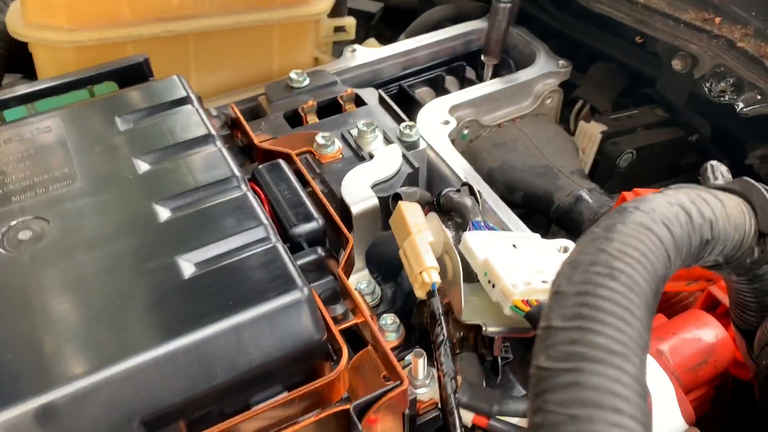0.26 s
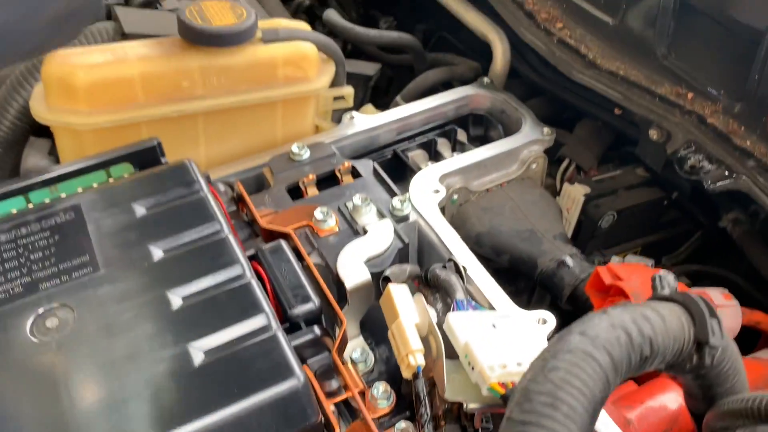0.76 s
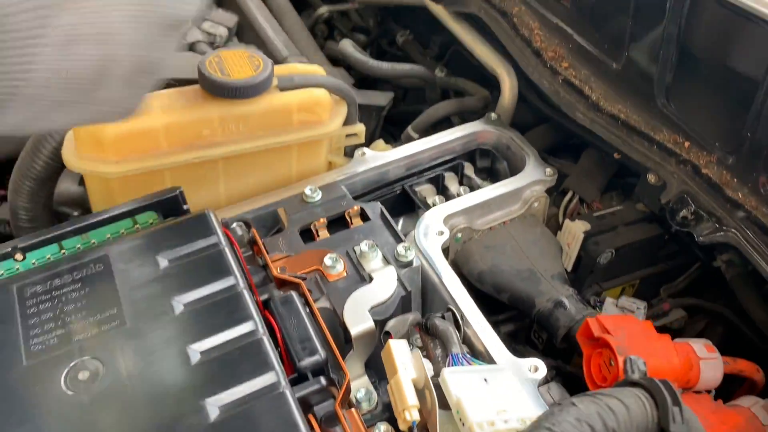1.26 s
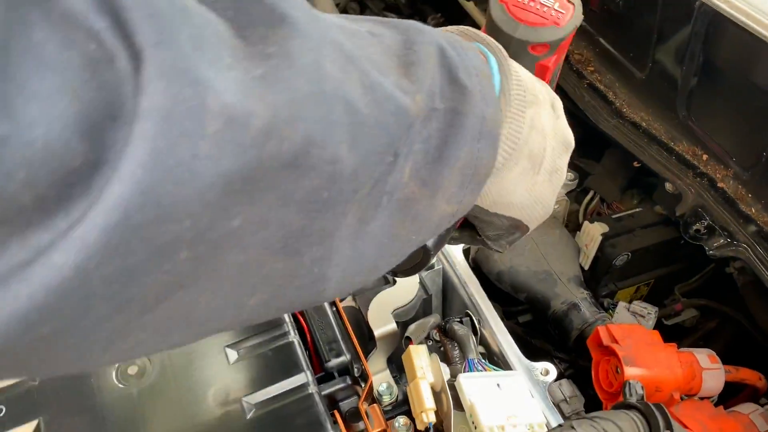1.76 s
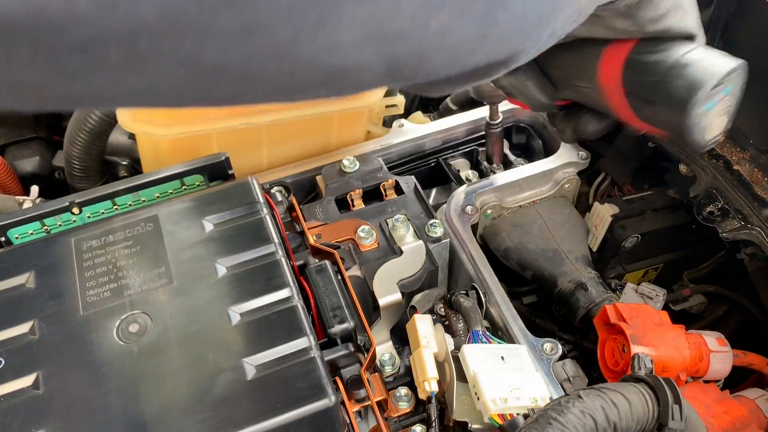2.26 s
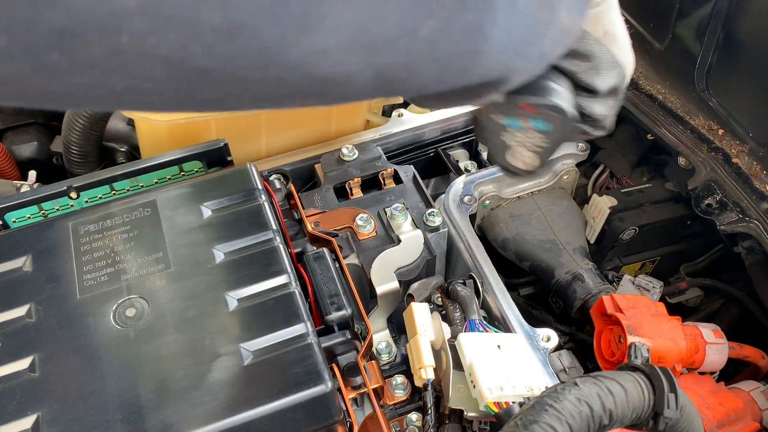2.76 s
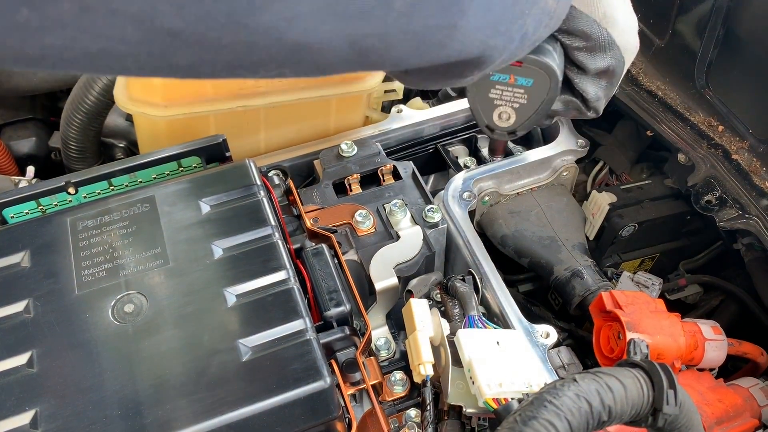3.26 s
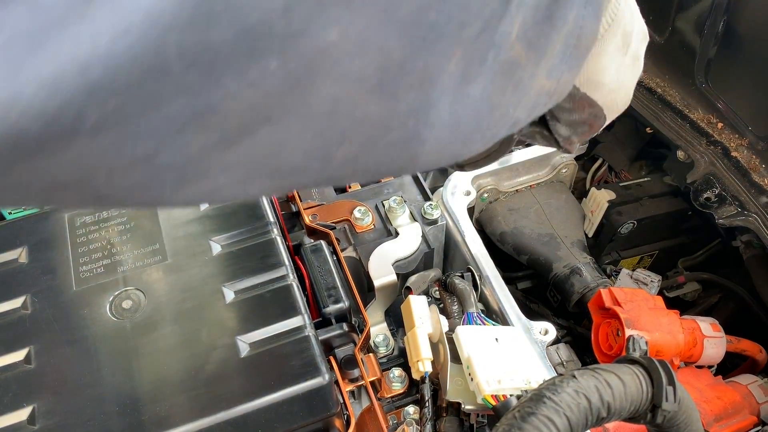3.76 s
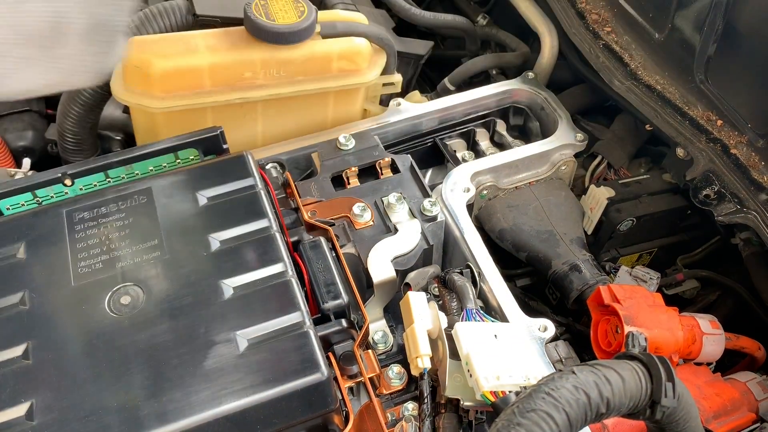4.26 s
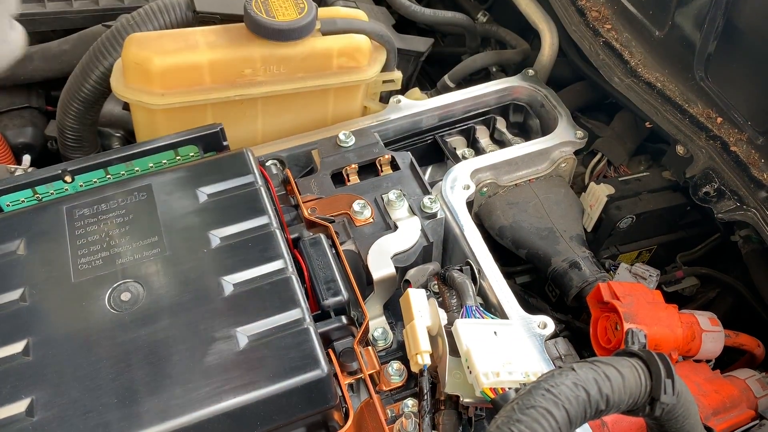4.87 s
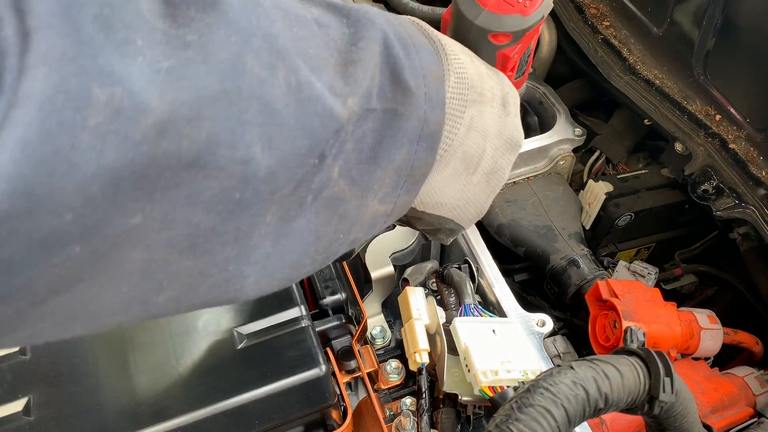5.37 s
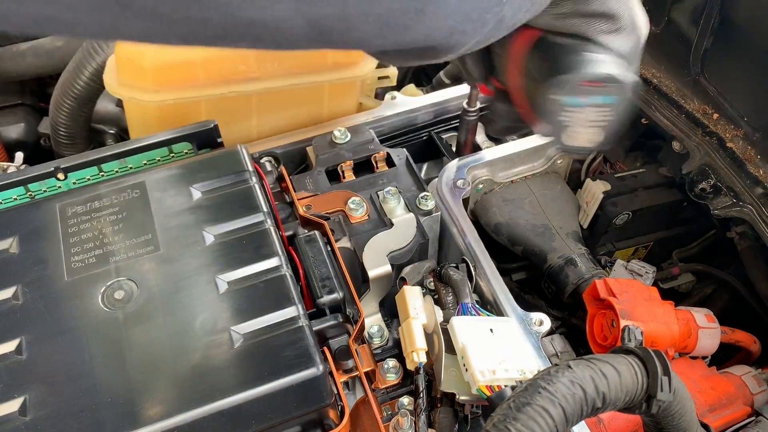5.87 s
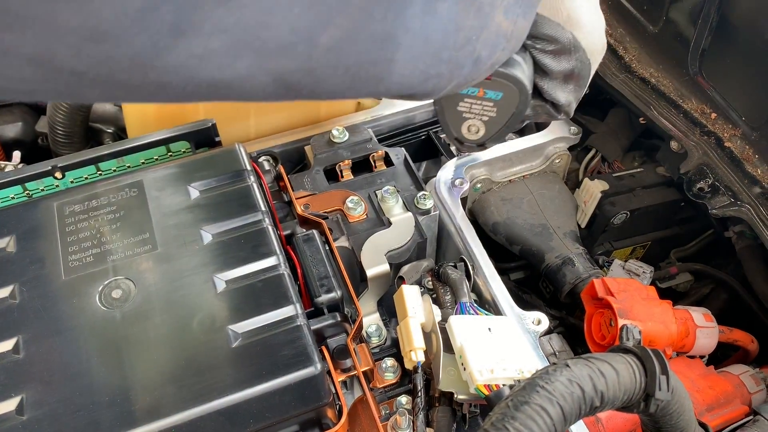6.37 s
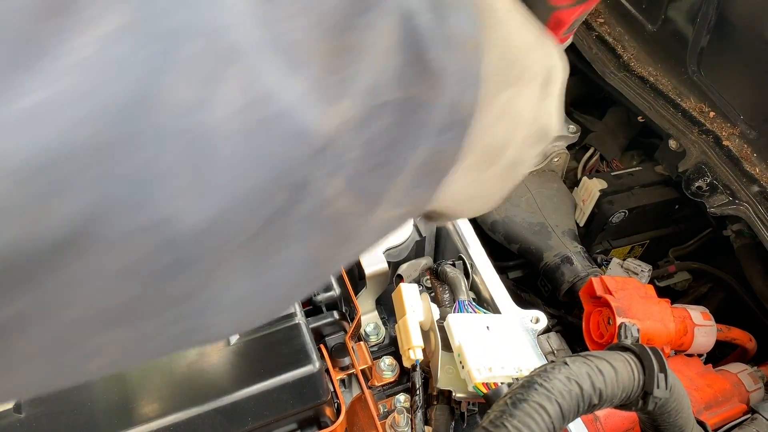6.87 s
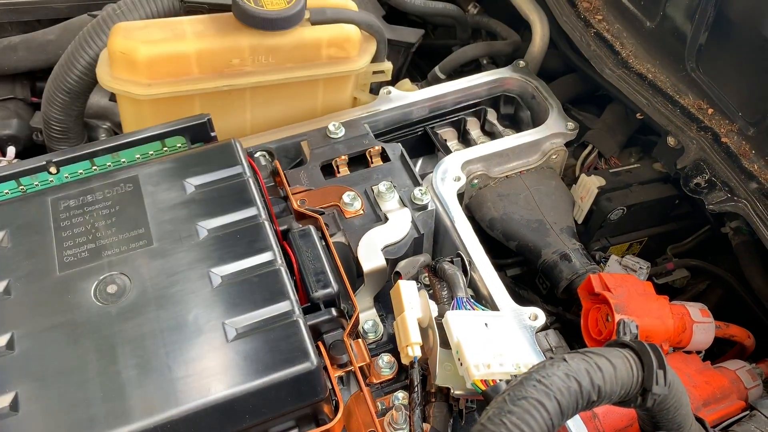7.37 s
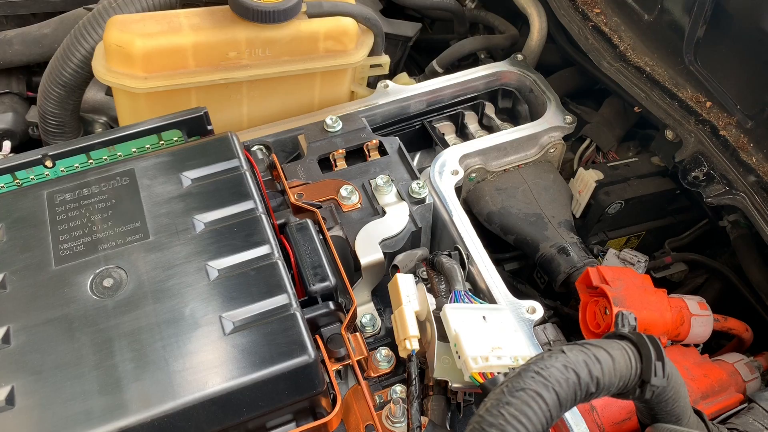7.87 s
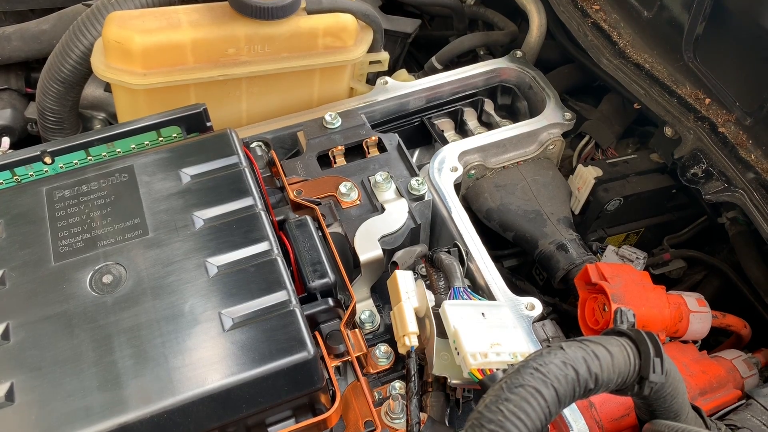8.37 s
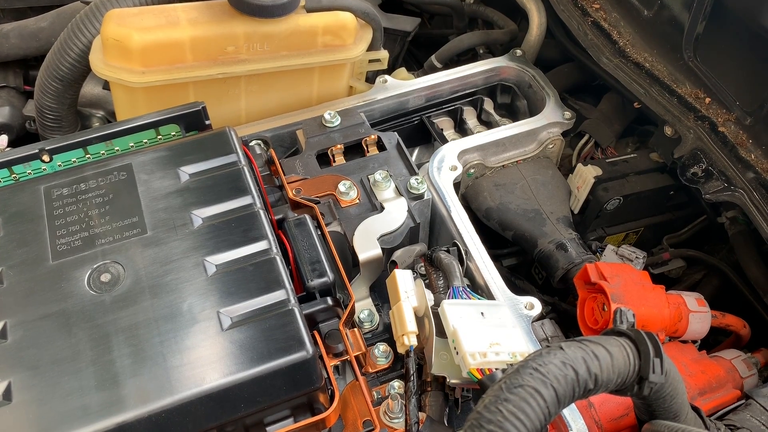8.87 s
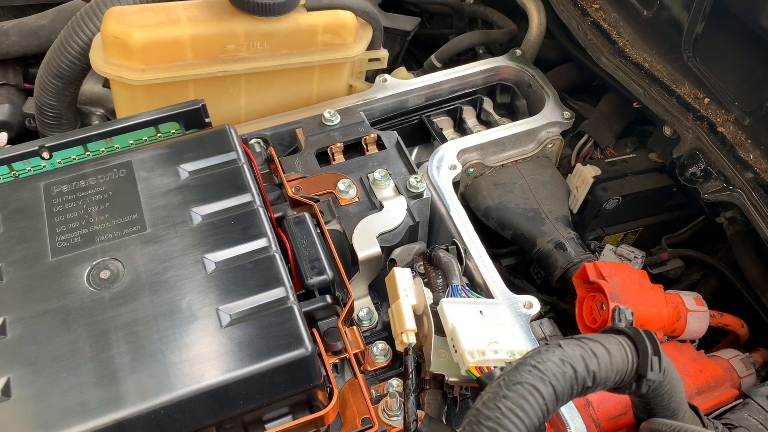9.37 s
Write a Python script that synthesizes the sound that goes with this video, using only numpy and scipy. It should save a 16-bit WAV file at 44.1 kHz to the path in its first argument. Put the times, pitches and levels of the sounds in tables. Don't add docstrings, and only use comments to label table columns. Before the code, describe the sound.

A cordless impact driver hammers loose bolts in three short loud bursts in a car engine bay, with metal taps, cloth rustle and low traffic between.

```python
import sys
import numpy as np
from scipy import signal
from scipy.fft import rfft, irfft, next_fast_len
from scipy.io import wavfile
from scipy.ndimage import uniform_filter1d, map_coordinates

SR = 44100
rng = np.random.default_rng(int(sys.argv[2]) if len(sys.argv) > 2 else 0)


def wrap_up_sound(samples):
    columns = np.atleast_2d(samples).T
    tamed = np.clip(columns, -1, 1)
    steps = np.round(tamed * 32767).astype(np.int16)
    wavfile.write(sys.argv[1], SR, steps)


def elevation(decibels):
    levels = np.asarray(decibels, float)
    return 10 ** (levels / 20)


N = 424683


def unit(x):
    return x / np.sqrt(np.mean(x ** 2) + 1e-20)


def along(points, hz):
    f, v = np.transpose(points)
    return np.interp(np.log(hz + 1), np.log(f + 1), v)


def curves(rows, outside=None):
    s, *cols = np.transpose(rows)
    return [np.interp(np.arange(N) / SR, s, c, outside, outside) for c in cols]


def wobble(rate):
    coarse = np.arange(0, N + 16, 16)
    knots = rng.standard_normal(6000)
    return np.interp(np.arange(N), coarse, map_coordinates(knots, [coarse * rate / SR]))


def filtered(x, response):
    m = next_fast_len(N + SR // 4, real=True)
    return irfft(rfft(x, m) * response(np.fft.rfftfreq(m, 1 / SR)), m)[..., :N]


def through(x, body):
    def shape(f):
        if len(body[0]) == 2:
            return elevation(along(body, f))
        total = 0
        for k, (centre, width, db) in enumerate(body):
            sign = (-1) ** k
            total = total + sign * elevation(db) * 1j * f * width / (centre * centre - f * f + 1j * f * width)
        return total

    norm = np.sqrt(np.mean(np.abs(shape(np.arange(1., SR / 2, 4))) ** 2))
    return filtered(x, lambda f: shape(f) / norm)


def ringing(x, hz, width_hz):
    return signal.lfilter(*signal.iirpeak(hz, hz / width_hz, fs=SR), x)


def grit(depth_db, rate):
    return unit(elevation(depth_db * wobble(rate)) * rng.standard_normal(N))


def patchy(x, depth_db):
    z = signal.stft(x, nperseg=512)[2]
    field = rng.standard_normal(z.shape[-2:])
    field = uniform_filter1d(field, size=5, axis=0)
    field = uniform_filter1d(field, size=30, axis=1)
    return signal.istft(z * elevation(depth_db * unit(field)), nperseg=512)[1][..., :N]


def contact(s, swell_s, count=1, hold_s=0):
    t, swell_s = np.arange(SR // 7) / SR, max(swell_s, .0005)
    u = (t - np.clip(t - swell_s, 0, hold_s)) / swell_s
    return round(s * SR), (u * np.exp(1 - u)) ** 1.6 * rng.standard_normal((count, len(u)))


def ports(x, lead, stretch=1):
    def response(hz):
        stretched = hz * (1 + (stretch - 1) / (1 + (hz / 4000) ** 8))
        return np.exp(.5j * np.outer([1, -1], along(lead, stretched)))
    return filtered(x, response)


# motor start t/s, hammer start t/s, release t/s, force level/dB
PULLS = [
    (-.45, -0.17, .131, 3),
    (3.075, 3.3566, 3.64, 0),
    (6.109, 6.3765, 6.574, -0.5),
]
STAGES = [
    (-48.5, -24.5, -26, -22, -20.5, -27, -40.5, -61),
    (-54.5, -24.5, -24.5, -21, -19, -23.5, -43.5, -70.5),
    (-46.5, -27.5, -29, -39.5, -28.5, -36.5, -42.5, -49.5),
    (-54.5, -28.5, -35.5, -36.5, -37, -42, -52.5, -65),
]
WAKE_S, BITE_S, SETTLE_S = 0.038, 0.014, 0.19
BUILD_S, COAST_S, STOP_S = 0.19, 0.061, .2


def stages(start, hammer, release, force_db, cover_db):
    s = [start - WAKE_S, start + BITE_S, start + SETTLE_S,
         hammer, hammer + BUILD_S, release, release + COAST_S, release + STOP_S]
    tool_db = np.add(STAGES[:3], force_db)
    drum_db = np.add(STAGES[3], cover_db)
    return curves(np.transpose([s, *tool_db, drum_db]), outside=-120)


# t/s, crack level/dB, housing level over crack/dB
KICKS = [(3.0779, -12, 0.5), (3.1023, -5.5, -2.5), (3.1134, -4.5, -19), (3.1347, -0.5, -8.5),
         (3.1669, -12, -9.5), (3.6205, -16.5, -15), (6.092, -25.5, -11), (6.103, -14, -7),
         (6.2315, -16, -9), (6.6137, -27, -12), (6.13, -10, -5.5), (6.1487, -2.5, -9.5), (.0034, -7, -11)]
# t/s, crack level/dB, housing level over crack/dB
BLOWS = [(0.0139, -8, -13.5), (0.0305, -6, -12), (0.0516, -5.5, -18), (0.0652, -9, -14), (0.0701, -8, -10),
         (0.0911, -8, -10.5), (0.11, -10.5, -10.5), (0.1245, -10, -11.5), (3.3582, -6.5, -10.5),
         (3.3774, -7.5, -7.5), (3.3979, -5.5, -11), (3.421, -13, -9.5), (3.4421, -7.5, -12.5),
         (3.4604, -8, -10), (3.481, -6, -13.5), (3.5009, -5, -17.5), (3.522, -7.5, -14.5),
         (3.5469, -6.5, -13.5), (3.5681, -7.5, -14), (3.5945, -11, -12.5), (6.3773, -6.5, -7),
         (6.3985, -4, -15), (6.419, -5.5, -12), (6.438, -7, -8), (6.4579, -8, -10), (6.4789, -6, -11),
         (6.4987, -9.5, -11), (6.5184, -8, -11), (6.5393, -14.5, -10.5), (6.5552, -16, -6),
         (6.5731, -9.5, -13.5)]


def blows():
    return list(KICKS) + [(s - .001, db, body_db) for s, db, body_db in BLOWS]


COVER_DB = (9.5, -2, -4)
# f/Hz, width/Hz, level/dB
HOUSING = [(547, 40, -9), (780, 82, -10.5), (898, 50, -3.5), (1100, 75, 2.5), (1430, 110, 2),
           (1620, 400, 0), (2034, 380, -0.5), (2490, 30, -7), (2616, 47, -3.5), (2800, 440, -0.5)]
# f/Hz, level per Hz/dB
STEEL = [(2300, -43), (2900, -0.5), (4000, -0.5), (5200, 3.5), (6000, 0), (8000, -3), (10000, -6),
         (12000, 0), (13500, -7), (15600, -13), (16200, -49.5)]
# f/Hz, width/Hz, level/dB
GRIP = [(49, 4.8, -1.5), (144, 36, 2.5), (275, 11, -9)]
# f/Hz, width/Hz, level/dB
DRUMMING = [(532, 55, -0.5), (685, 170, -2.5), (400, 220, -5), (270, 40, -3)]


def driver():
    levels = [stages(*pull, db) for pull, db in zip(PULLS, COVER_DB)]
    housing_db, gear_db, shake_db, cover_db = np.max(levels, axis=0)
    housing, gears, shake = np.zeros((3, N + SR))
    housing[:N] = elevation(housing_db - 1.56) * grit(depth_db=1.5, rate=110)
    gears[:N] = elevation(gear_db + 2.0) * grit(depth_db=3.2, rate=330)
    shake[:N] = elevation(shake_db - 4.0) * grit(depth_db=5.0, rate=18)
    cover = elevation(cover_db) * grit(depth_db=4.0, rate=46)
    for s, db, body_db in blows():
        at, (crack,) = contact(s, swell_s=.0021)
        gears[at:][:len(crack)] += elevation(db - 3.5) * crack
        at, (knock, kick) = contact(s, swell_s=0.0029, count=2)
        housing[at:][:len(knock)] += elevation(db + body_db - 1.0) * knock
        shake[at:][:len(kick)] += elevation(db + body_db - 9.0) * kick
    casting = through(patchy(housing[:N], depth_db=1.5), HOUSING)
    return casting + through(gears[:N], STEEL) + through(shake[:N], GRIP) + through(cover, DRUMMING)


# f/Hz, level per Hz/dB
RUMBLE = [(12, -35.5), (20, -3.5), (48, 1.5), (124, -2.5), (195, -12.5), (255, -16.5), (330, -18.5),
          (359, -17.5), (600, -50.5), (780, -63), (1320, -120)]


def traffic(effort_db):
    rumble_db = -44.5 + .35 * effort_db
    return elevation(rumble_db) * through(grit(depth_db=2.0, rate=4.4), RUMBLE)


# f/Hz, level per Hz/dB
RUB = [(240, -40), (400, -3.5), (769, -6.5), (1870, -8.5), (2350, -10.5), (2760, -19), (3500, -31),
       (4550, -61.5), (7700, -120)]


def glove(effort_db):
    rub_db = -59.5 + effort_db + 0.5 + 1.2 * wobble(22) + 1.8 * wobble(3.9)
    return elevation(rub_db) * through(patchy(rng.standard_normal((3, N)), depth_db=1.8), RUB)


# f/Hz, level per Hz/dB
RUSTLE = [(2000, -28.5), (3000, -2), (4500, 0.5), (7000, -2.5), (10000, -8.5), (11500, -1.5),
          (13500, -12.5), (15600, -13.5), (16100, -47)]
# t/s, half length/s, level over usual/dB
SWISHES = [(0.55, 0.035, 5), (.7, .04, 3.5), (.85, .03, -6), (1.053, .07, 4.5), (1.38, .06, -4),
           (1.697, .04, 9.5), (1.8, .03, -6), (3.955, .1, 3), (4.329, 0.059, -3), (4.52, 0.033, 10),
           (4.78, .055, 10), (4.963, .06, -7), (5.17, 0.013, 1), (5.294, .06, 6.5), (5.403, .03, -7),
           (6.997, .05, 2.5), (7.227, .05, -11.5), (7.547, 0.022, 5), (7.63, .04, -5)]
# t/s, level/dB
FAR_HISS = [
    (7.45, -71.5),
    (7.76, -60),
    (8.15, -58),
    (9.63, -57),
]


def sleeve(effort_db):
    t, stir_db = np.arange(N) / SR, 0
    for s, half, db in SWISHES:
        corners = [s - 2 * half, s - half / 2, s + half / 2, s + 2 * half]
        stir_db = stir_db + np.interp(t, corners, [0, db, db, 0])
    rustle_db = -71 + 1.4 * effort_db + stir_db + 1.2 * wobble(25)
    rustle_db = np.maximum(rustle_db, curves(FAR_HISS)[0])
    return elevation(rustle_db + 2.5 + 0.6 * wobble(8)) * through(rng.standard_normal((3, N)), RUSTLE)


# t/s, effort level over rest/dB
HAND = [(.3, 2.5), (.91, -1), (1.59, -5), (2.12, 3), (2.31, 12), (2.45, 9), (2.85, 0), (3.05, 8.5),
        (3.96, -3), (4.16, 2.5), (4.48, -2.5), (5.5, 0), (5.75, 8.5), (6.06, 6.5), (6.74, 1.5), (9.36, 1.5),
        (9.528, 18), (9.63, 10.5)]
# f/Hz, phase/rad
AIR_LEAD = [(0, 0), (80, -.1), (260, -0.3), (600, 3.0), (950, 3.5), (1210, 3.5), (1810, 2.1), (2840, 3.9),
            (5000, 2.8), (7670, 6.3), (8870, 6.5), (11700, 9.5), (13000, 9.4), (14600, 12.3), (16400, 12.7)]
# f/Hz, level/dB
HAZE = [(300, -12), (600, -3), (2500, -4), (4000, 0), (5200, -9), (7000, -9), (8000, -28), (12800, -28),
        (14000, -3)]


def surroundings():
    effort_db, = curves(HAND)
    hiss = glove(effort_db) + sleeve(effort_db)
    unlike = filtered(hiss[1:], lambda hz: elevation(along(HAZE, hz)))
    return traffic(effort_db) + ports(hiss[0], AIR_LEAD) + unlike


# t/s, knock level/dB, tick over knock/dB, thud over knock/dB, ring f/Hz
SEEKING = [(1.8575, -42.5, -13, -5, 1100), (1.8768, -44.5, 2, -20, 1340), (1.918, -23.5, -16, -17, 2140),
           (1.9483, -38, -4, -2.5, 1065), (2.1237, -16, -14, -15.5, 1190), (2.2001, -37.5, -19, -0.5, 1110),
           (2.2751, -27, -12.5, -14.5, 1120), (2.3177, -30.5, -5.5, -4.5, 1100),
           (2.4, -29.5, -38, -15, 1760), (2.4485, -23, -14, -12, 1750), (2.5041, -30.5, -27, -10, 1840),
           (2.5422, -11.5, -9, -15.5, 2100), (2.5992, -44, -19.5, 7.5, 1100), (2.7238, -41, -41, -11, 2100),
           (2.803, -29, -36, -29, 1100), (2.8692, -35, -25, -9, 1098), (2.9138, -43, -34.5, -3.5, 1100),
           (2.948, -44.5, -24, -14, 1410), (2.9773, -36.5, -10.5, -27, 1406), (2.9938, -44.5, 1, -3, 1602),
           (3.042, -38, -0.5, -7, 1260)]
# t/s, knock level/dB, tick over knock/dB, ring f/Hz
SEEKING_AGAIN = [(4.8832, -43.5, -32.5, 970), (5.23, -46, -8.5, 1080), (5.452, -22.5, -20, 1070),
                 (5.497, -21.5, -26, 1100), (5.6146, -38, -24, 1630), (5.6471, -35.5, -46, 991),
                 (5.68, -24.5, -20, 940), (5.7628, -39, -15.5, 1070), (5.802, -28, -14, 980),
                 (5.8426, -27.5, -16, 1100), (5.9283, -31.5, -10, 1000), (5.947, -28.5, -23, 1130),
                 (6.034, -32.5, -10, 1100), (6.072, -35, -20, 1350), (5.793, -34.5, -18, 1500),
                 (2.296, -37, -11, 1800), (2.629, -43, -15, 1500), (8.908, -45, -14, 1050),
                 (7.081, -53.5, -25, 796), (0.2537, -25, -2, 1090), (0.2849, -34.5, -16, 1066)]
# t/s, knock level/dB, tick over knock/dB, ring f/Hz
CLICKS = [(0.1747, -19.5, 3.5, 1536), (0.2314, -24.5, -6.5, 1400), (0.9197, -43.5, 2, 1060),
          (1.2279, -38, 4, 902), (3.7145, -27, 0, 1610), (4.2194, -56.5, 6.5, 1692), (4.4084, -41, 0, 1480),
          (4.426, -61.5, 13.5, 1580), (4.437, -42, 9, 1130), (4.5009, -54, 3.5, 1486),
          (4.6053, -36.5, -16, 2130), (4.6258, -37.5, 0.5, 1420), (4.6896, -41, -6.5, 993),
          (6.6229, -30, 1.5, 1351), (6.6591, -36, 1.5, 1530), (6.671, -36, 2.5, 1100),
          (6.7058, -28, 5.5, 2220), (.9868, -54, -7.5, 900), (1.194, -46, -6, 1500), (.902, -48, 1, 1000),
          (1.03, -52, -9.5, 857), (3.75, -49.5, 0, 1590), (.32, -53.5, -1.5, 1100)]
# t/s, knock level/dB, tick over knock/dB, ring f/Hz
PUT_DOWN = [
    (9.3509, -26.5, -10, 1970),
    (9.3982, -25, -2, 2880),
    (9.414, -20, -6, 1676),
    (9.44, -27, -5.5, 3765),
    (9.5999, -35.5, -9.5, 1665),
]
# t/s, knock level/dB, tick over knock/dB, ring f/Hz, swell/ms
SCRAPES = [
    (3.665, -29, -6, 1664, 20),
    (5.82, -35, -17, 1170, 23),
    (9.355, -31, -5, 1880, 24),
    (9.392, -17, -31, 3846, 11),
    (2.11, -35, -18, 1136, 8),
    (5.439, -39, -26, 1100, 7.2),
    (9.42, -27.5, -3.5, 3480, 32),
]
# t/s, knock level/dB, tick over knock/dB, ring f/Hz, hold/ms
DRAGS = [
    (.583, -50.5, 0, 1494, 51),
    (1.625, -51, -8, 1230, 30),
    (4.128, -40, -8.5, 1300, 65),
    (7.34, -50, 4, 1500, 47),
]


def contacts():
    def seek_ms(db):
        return 4.6 + 0.15 * (db + 31.5)

    return ([(*row, seek_ms(row[1]), 0) for row in SEEKING]
            + [(s, db, tick, -12, hz, seek_ms(db), 0) for s, db, tick, hz in SEEKING_AGAIN]
            + [(s, db, tick, -24.5, hz, 2.97, 0) for s, db, tick, hz in CLICKS]
            + [(s, db, tick, -20.5, hz, 7, 0) for s, db, tick, hz in PUT_DOWN]
            + [(s, db, tick, -30, hz, ms, 0) for s, db, tick, hz, ms in SCRAPES]
            + [(s, db, tick, -30, hz, 10, ms) for s, db, tick, hz, ms in DRAGS])


# f/Hz, width/Hz, level/dB
PIPE = [(150, 50, -2), (270.4, 9, 8), (380, 60, -10), (537.4, 8, 8), (606, 18, -0.5), (687, 23, -7),
        (1090, 23, -2)]
# f/Hz, level per Hz/dB
SNAP = [(8000, -29.5), (11000, -1.5), (15600, -6), (16200, -46.5)]
LIGHTER_DB_PER_OCTAVE = 3


def taps():
    knock, tick, thud, ring, snap = np.zeros((5, N + SR))
    for s, db, tick_db, thud_db, hz, swell_ms, hold_ms in contacts():
        swell_s, hold_s = swell_ms / 1000, hold_ms / 1000
        at, (a, b, c) = contact(s, swell_s, count=3, hold_s=hold_s)
        knock_db = db - 6.5 - LIGHTER_DB_PER_OCTAVE * np.log2(hz / 1100)
        knock[at:][:len(a)] += elevation(knock_db) * a
        ring[at:][:len(a)] += elevation(db + 8) * ringing(b, hz, width_hz=280)
        push_at = at + np.argmax(np.abs(c))
        thud[push_at] += elevation(db + thud_db + 0.5) * np.linalg.norm(c)
        at, (bright, thin) = contact(s, 0.8 * swell_s, count=2, hold_s=hold_s)
        tick[at:][:len(a)] += elevation(db + tick_db + 3.5) * bright
        snap[at:][:len(a)] += elevation(db + 3.1 * tick_db - 6.5) * thin
    casting = through(knock[:N], HOUSING) + ring[:N]
    bright = through(tick[:N], STEEL) + through(snap[:N], SNAP)
    return casting + through(thud[:N], PIPE) + bright


# start t/s, end t/s, f/Hz, level/dB
SWITCH = [
    (3.03, 3.08, 9970, -37.5),
    (6.071, 6.105, 10200, -41),
]
WHINE_DB = (-39, -30, -26, -45)
WHINE_FROM_HZ, WHINE_TOP_HZ = 6300, 7420
RUN_UP_S, WHINE_DELAY_S, WHINE_RISE_S, WHINE_END_S = .11, .07, 0.15, .04


def whine():
    tone, t = np.zeros(N), np.arange(N) / SR
    flutter, throb = wobble(170), wobble(70)
    for start, end, hz, db in SWITCH:
        pressed = (t > start) & (t < end)
        tone += elevation(db) * pressed * np.sin(2 * np.pi * hz * t + 1.8 * flutter)
    for start, hammer, *_ in PULLS:
        heard = start + WHINE_DELAY_S
        lag = np.exp(-np.clip(t - heard, 0, None) / RUN_UP_S)
        pitch_hz = WHINE_TOP_HZ - (WHINE_TOP_HZ - WHINE_FROM_HZ) * lag
        s = [heard, heard + WHINE_RISE_S, hammer, hammer + WHINE_END_S]
        level_db = np.interp(t, s, WHINE_DB, -120, -120)
        turn = 2 * np.pi * np.cumsum(pitch_hz * (1 + 0.013 * flutter)) / SR
        lines = np.sin(turn) + elevation(1.5) * np.sin(1.1 * turn) + elevation(-5) * np.sin(.66 * turn)
        tone += elevation(level_db + 2.0 * throb) * lines
    return tone


# t/s, peak level/dB, f/Hz
DRIPS = [(7.4988, -48.5, 1780), (7.517, -47, 2400), (7.6102, -51.5, 2334), (7.636, -45, 2260),
         (7.66, -44, 2420), (7.7, -52.5, 1740), (7.7684, -50, 2570), (7.792, -46, 2310), (7.821, -42, 1707),
         (7.8952, -49, 2880), (7.9235, -51, 1820), (7.953, -50, 2470), (8.025, -51, 2110),
         (8.0825, -49.5, 2350), (8.1393, -54, 1810), (8.2275, -51, 1840), (8.554, -49, 2560),
         (8.678, -60, 1900), (8.742, -48, 1850), (8.8362, -48, 1800), (8.9054, -52.5, 1540),
         (8.9594, -49, 2600), (9.279, -56, 1940)]


def drips():
    out = np.zeros(N + SR)
    for s, db, hz in DRIPS:
        at, (rattle,) = contact(s, swell_s=0.0065)
        tone = ringing(ringing(rattle, hz, width_hz=350), hz, width_hz=350)
        out[at:][:len(rattle)] += elevation(db - 0.5) * tone / np.abs(tone).max()
    return out[:N]


# f/Hz, t60/s
BAY = [(200, 0.12), (1000, 0.11), (4000, 0.065), (10000, 0.017)]


def bay(x, count):
    hz, t, z = signal.stft(rng.standard_normal((count, SR // 4)), SR, nperseg=256)
    decay = elevation(-60 * t / along(BAY, hz)[:, None])
    tail = signal.istft(z * decay, SR, nperseg=256)[1]
    return signal.fftconvolve(x[None], tail / np.linalg.norm(tail[0]), axes=1)[:, :N]


# f/Hz, phase/rad
TOOL_LEAD = [(0, 0), (40, -.05), (180, -.2), (520, -0.5), (860, -1.6), (1290, -0.3), (1980, 0.3),
             (2650, -2.0), (3500, -4.2), (4000, -4.6), (4700, -4.0), (5500, -2.3), (6120, -1.1),
             (8870, 0.2), (10500, 1.9), (11100, 3.05), (13000, 3.25), (15200, 6.2), (16400, 6.2)]
# f/Hz, level/dB
DIFFUSE = [(150, -28), (600, -3), (1300, -7), (2300, -6), (2750, -9), (3050, -24), (3350, -22), (3700, -9),
           (5000, -14), (6200, -8), (9500, -11), (11000, -36), (12800, -36), (13800, -8)]
# t/s, share 0-1 of the lean towards the ports
SWAY = [(0, 0.6), (.3, 0.8), (2.3, .7), (3.17, 0.5), (3.48, 0.4), (4.8, 0.7), (6.2, .8), (6.4, 0.4),
        (6.6, 0.5), (9.63, 0.3)]


def scene():
    work = driver() + taps() + whine()
    tails = bay(work, count=3)
    work = work + elevation(-10) * tails[0]
    unlike = filtered(tails[1:], lambda hz: elevation(along(DIFFUSE, hz)))
    sway = np.clip(curves(SWAY)[0] + 0.25 * wobble(9), 0, 1)
    leaning = ports(sway * work, TOOL_LEAD, stretch=1.15)
    upright = ports((1 - sway) * work, TOOL_LEAD, stretch=.9)
    return leaning + upright + unlike + surroundings() + drips()


# f/Hz, level/dB
LEAN = [(150, 0), (350, .3), (700, -.5), (1400, -3), (2800, -1), (6000, -.4)]


def stereo_balance(dry):
    width_db = [(1200, 2), (2500, -3.0), (6000, -1.0), (9000, -3), (16000, -4.5)]  # f/Hz, level/dB
    side = (dry[0] - dry[1]) / 2
    removed = filtered(side, lambda hz: 1 - elevation(along(width_db, hz)))
    x = dry - np.outer([1, -1], removed)
    return filtered(x, lambda hz: elevation(np.outer([.5, -.5], along(LEAN, hz))))


def top_cut(x):
    return signal.sosfilt(signal.butter(12, 16790, fs=SR, output="sos"), x)


def record(dry):
    x = stereo_balance(dry)
    mix = x / (1 + np.abs(x) ** 6) ** (1 / 6)
    return top_cut(mix)


dry = scene()
out = record(dry)
wrap_up_sound(out)
```